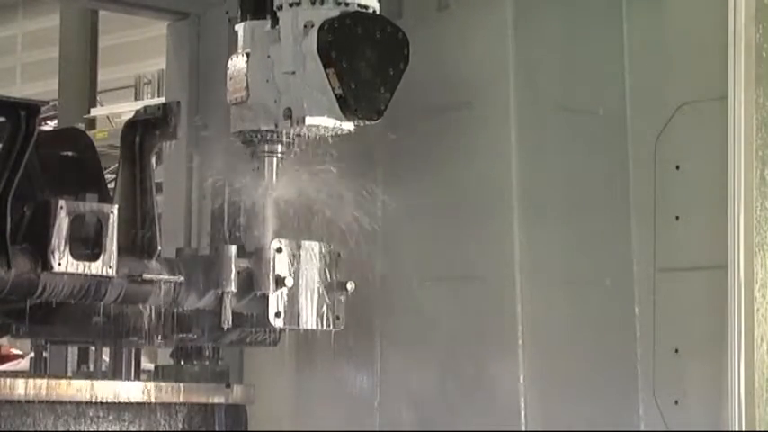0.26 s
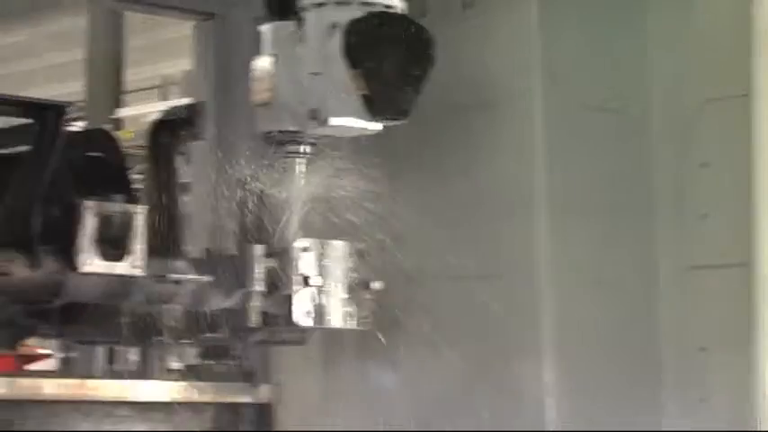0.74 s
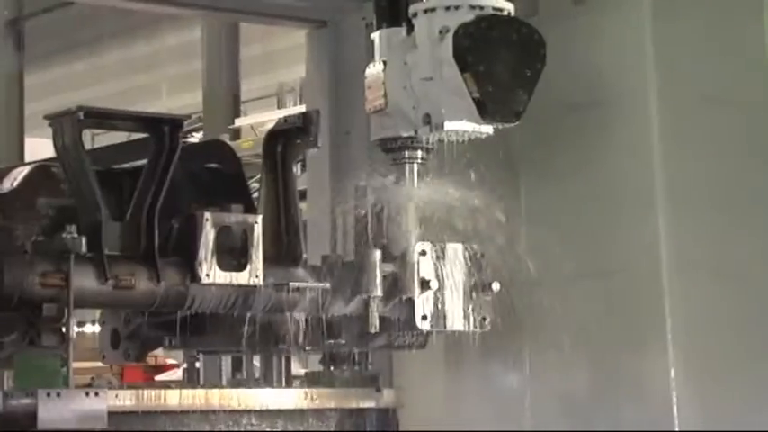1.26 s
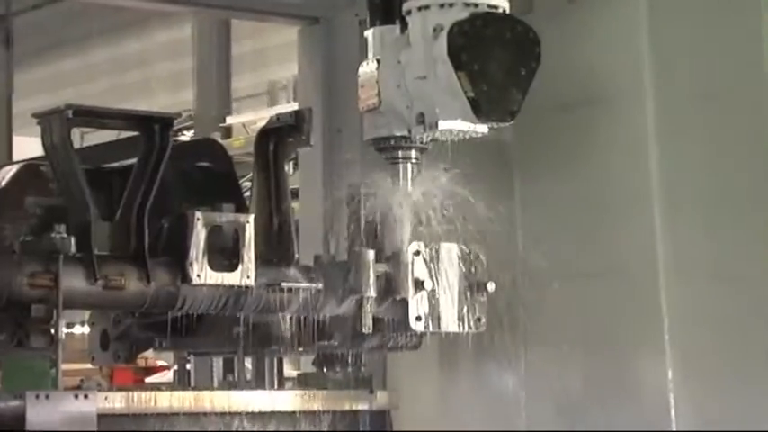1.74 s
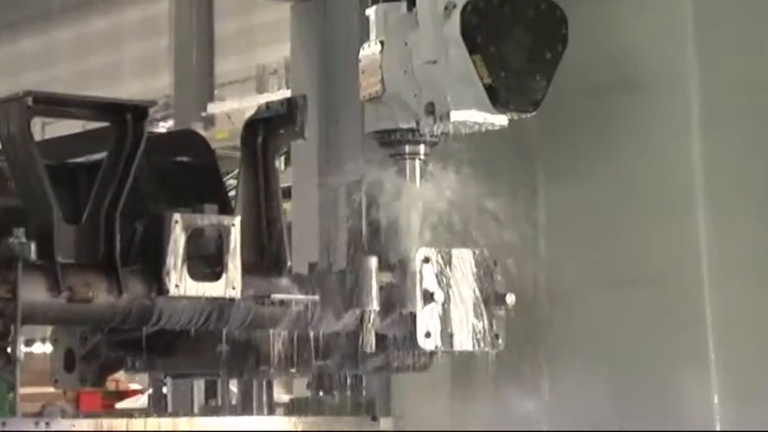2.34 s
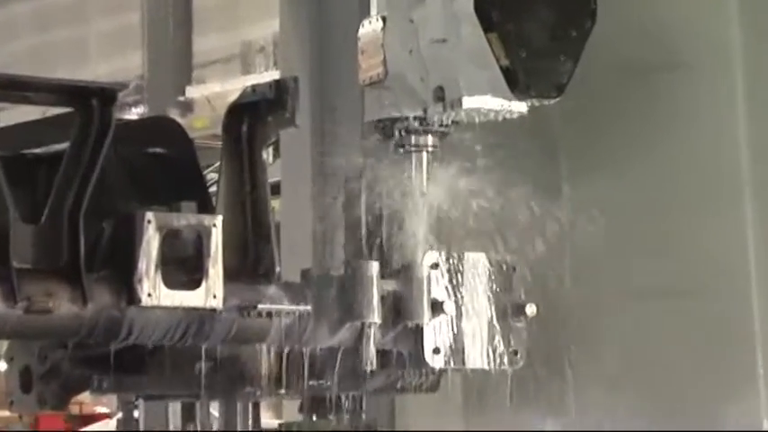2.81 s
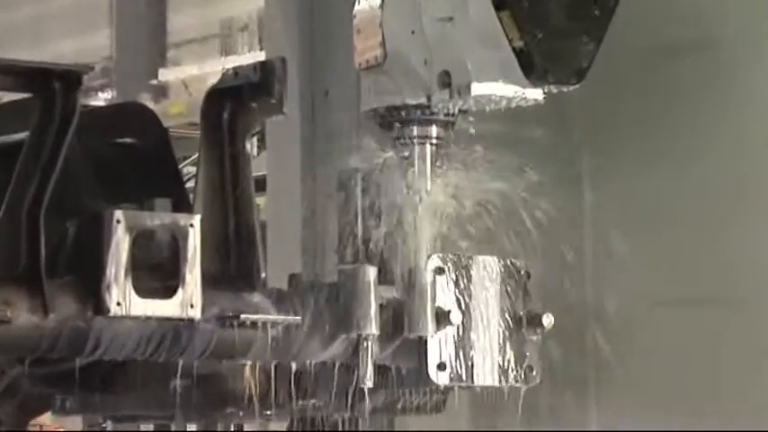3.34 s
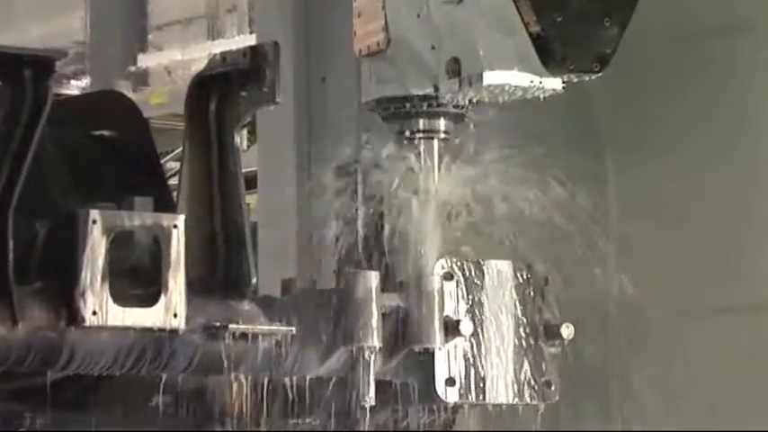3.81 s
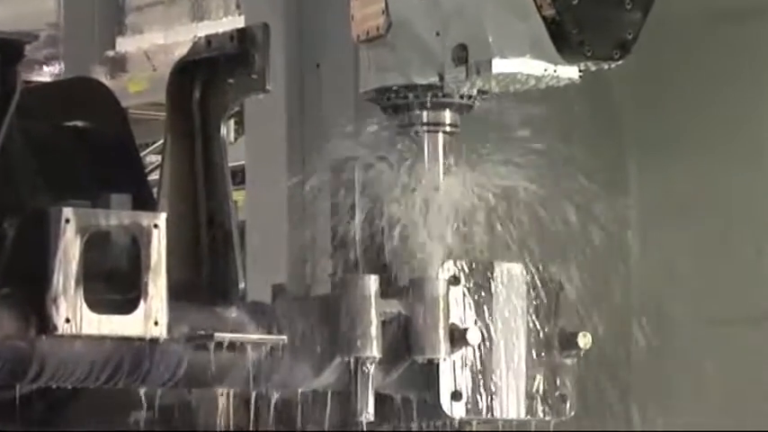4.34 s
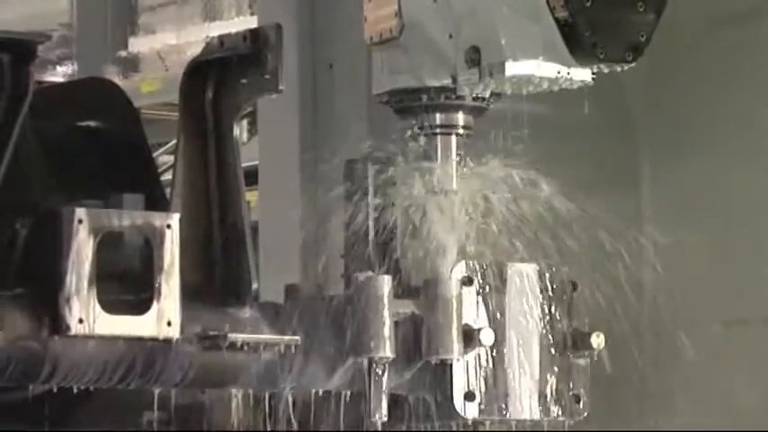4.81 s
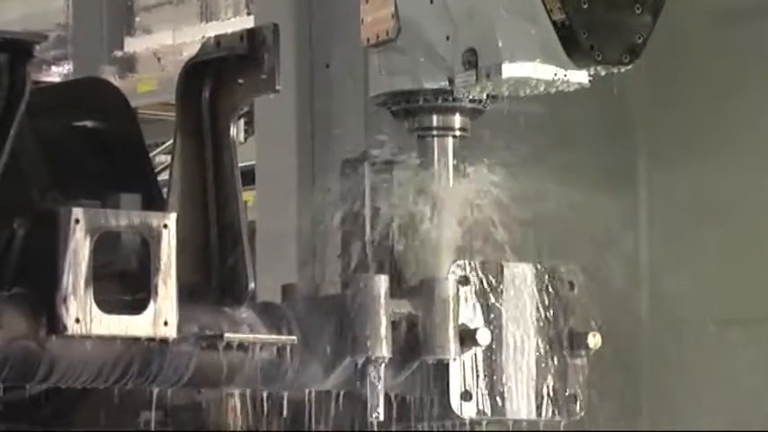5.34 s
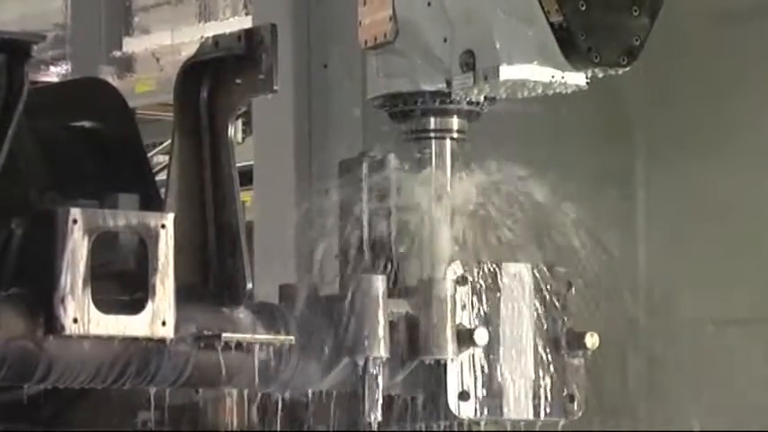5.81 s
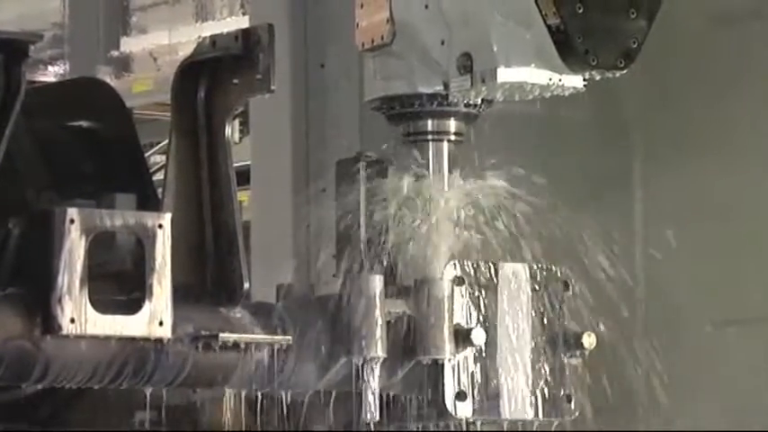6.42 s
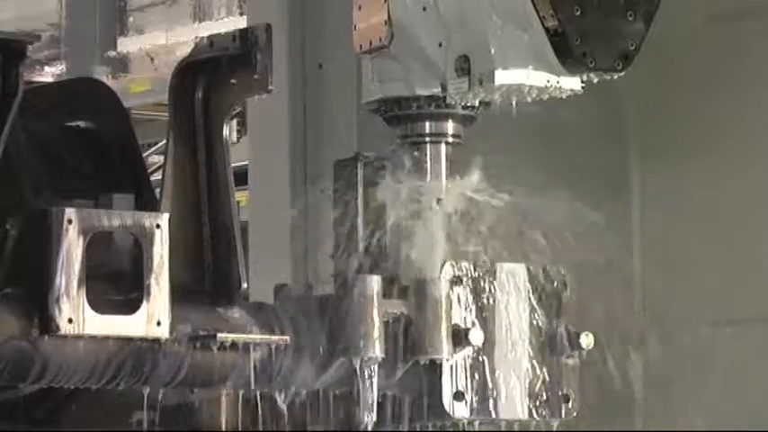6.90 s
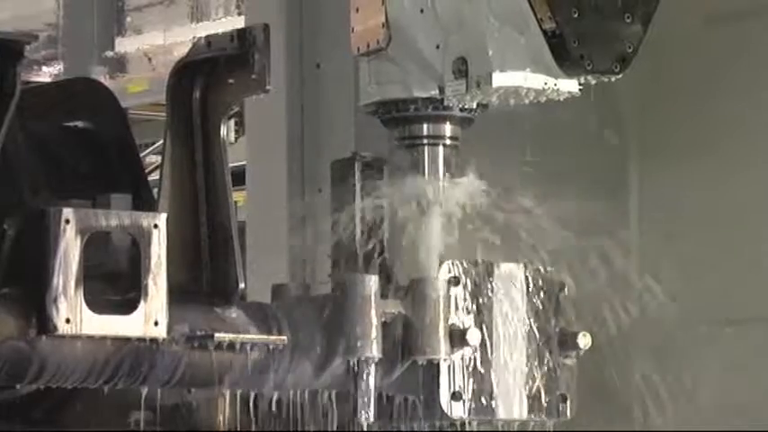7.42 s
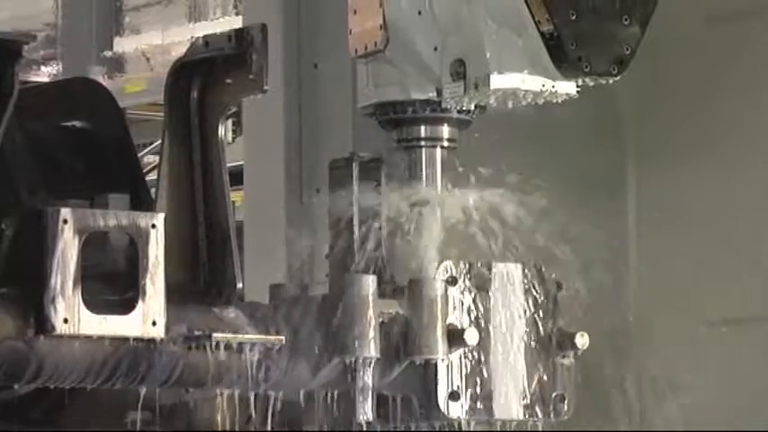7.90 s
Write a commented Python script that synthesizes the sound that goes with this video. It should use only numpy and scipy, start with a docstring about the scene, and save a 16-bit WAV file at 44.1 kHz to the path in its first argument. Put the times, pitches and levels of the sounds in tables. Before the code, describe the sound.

A piercing, uneven squeal comes from a milling tool scraping through metal, faltering and flaring shrilly, with a few short crunches of chips. After five seconds it settles suddenly into a stronger, steadier tone a little lower in pitch. Underneath, the steady hiss of spraying coolant, a low pump rumble and the spindle's hum fill the sheet-metal enclosure, with the cut sounding near and in front of everything else.

```python
"""Inside the cabin of a milling machine, a spinning cutter chatters in a metal part under a flood of coolant.
The shaking tool squeals near 2.5 kHz, ragged at first, then locks on a louder, slightly lower note
after five seconds. Chips crunch, the spray hisses, the pump rumbles and the spindle that turns the
tool hums. A limiter pushes all of it down whenever the squeal swells."""
import sys
import numpy as np
from scipy import signal
from scipy.fft import rfft, irfft, next_fast_len
from scipy.io import wavfile
from scipy.ndimage import uniform_filter1d

SR = 44100
rng = np.random.default_rng(int(sys.argv[2]) if len(sys.argv) > 2 else 0)


def master_out(mix):
    """Clip the mix to full scale and print it as 16-bit PCM to the path in sys.argv[1]."""
    frames = np.transpose(np.atleast_2d(mix))
    ceiling = np.clip(frames, -1, 1)
    pcm = np.round(ceiling * 32767).astype(np.int16)
    wavfile.write(sys.argv[1], SR, pcm)


N = 359415
TIME = np.arange(N) / SR
FREQS = np.fft.rfftfreq(N, 1 / SR)
SPINDLE_HZ = 41.37  # turns of the tool each second
LOCK_S, LOCK_TAKES_S = 4.96, 0.0413  # the ragged chatter locks into one clean note

# the squeal shifts briefly in pitch: (time [s], pitch shift [Hz], half length [s], lift [dB]); at the very
# start the upper side tone of the spindle swing takes over the note, later the tool hops to a nearby note
HOPS = [(.04, 20, 0.0804, 2), (1.1, 28, 0.051, .5), (2.03, -36.5, 0.037, 5), (4.52, -31.5, .06, 1)]


def squeal(rival_hz=2452, drift_hz=7, wander_db=0.76):
    """The tool vibrates by itself; uneven chips smear the note, and each spindle turn swings it."""
    # the cut bites unevenly: (time [s], drop [dB], half length [s], added raggedness [dB])
    falters = [(.14, 6.5, 0.019, 2), (.3, 5.5, 0.027, 3), (.59, 7.5, 0.046, 4), (1.49, 4, 0.067, 10.5),
               (1.7, 2.5, 0.17, 11.5), (2.25, 5, 0.091, 3), (2.61, 8, 0.061, -9), (2.88, 4.7, 0.033, -4.5),
               (3.18, 6.5, .16, 3.5), (3.67, 2, 0.22, 2.5), (4.11, 2.5, 0.082, -5), (4.57, 10, 0.031, 4.5),
               (4.74, 6, 0.099, 8), (4.92, 3.5, 0.054, 9), (5.55, 7, 0.087, 12.5), (6.74, 4.5, 0.045, 6),
               (6.93, 7.5, 0.079, 13), (7.18, 4.5, 0.073, -8), (7.75, 4.5, 0.051, 12)]
    # side tones of the swing: (distance from the note [times the spindle rate], relative level [dB])
    side_tones = [(-3, -11.5), (1, -3.5), (2, -8.5), (3, -12), (4, -15.5)]
    # where the squeal sits between the ears: (time [s], left minus right [dB])
    pan = [(0, 3.5), (.3, 3), (1, 2.5), (2.25, 3.5), (3.2, 1.5), (3.75, -3.5), (4.5, 1.5), (5.4, 0),
           (6.8, -1.5), (8.15, -2)]
    falter_db = swells(falters)
    level_db = state(ragged=-10.5, locked=-2.5) - falter_db + swells(HOPS, column=3)
    level_db += wander_db * flutter(4.8).real
    raggedness = gain_of(state(ragged=-7.5, locked=-20.5) + swells(falters, column=3))
    note = tone(pitch() + drift_hz * raggedness * flutter(6.41).real)
    swing = sum(gain_of(db) * np.exp(2j * np.pi * multiple * SPINDLE_HZ * TIME) * flutter(7)
                for multiple, db in side_tones)
    smear = gain_of(-6) * flutter(30)
    ring = note * (1 + raggedness * (smear + gain_of(-2) * swing))
    # a second vibration of the tool beats against the note
    ring += gain_of(state(ragged=-5.5, locked=-34)) * tone(rival_hz) * flutter(5)
    # the moving curtain of coolant makes even the locked note sway
    ring *= 1 + gain_of(-14) * flutter(32, order=4)
    # the cut sets how far the tool swings, however the two vibrations share the motion
    ring /= np.sqrt(uniform_filter1d(abs(ring) ** 2, size=6500) / 2)
    # reflections off the cabin walls reach the two ears differently
    sides = np.array([[1], [-1]])
    reflections = sides * gain_of(-20) * (note * flutter(10)).real
    ears = ring.real * gain_of(sides * follow(pan) / 2) + reflections
    return gain_of(level_db) * (ears + scrape(falter_db, rival_hz))


def pitch(sag_hz_per_s=1.1):
    """The squeal's pitch in Hz: it sinks slowly along the cut, hops, and steps down as it locks."""
    return state(ragged=2490, locked=2459) - sag_hz_per_s * TIME + swells(HOPS)


def scrape(falter_db, centre_hz, reach_hz=900, rasp=0.2):
    """The cutter's teeth scrape the metal, ringing the tool and the part in a band around the note."""
    # ringing of the tool and the part: (frequency [Hz], relative level [dB])
    ringing = [(1800, -31), (1900, -52), (1970, -14), (2150, -8), (2260, -5.5), (2330, -3.5), (2420, 4.5),
               (2520, -2.5), (2590, -12.5), (2660, -7.5), (2780, -9.5), (2900, -37), (3300, -57)]
    outside = abs(FREQS - centre_hz) > reach_hz
    noise = coloured(rng.standard_normal((2, N)), spectrum(ringing, FREQS) - 60 * outside)
    # the teeth keep scraping while the note falters, so most of its drop is given back
    level_db = state(ragged=-10.5, locked=-12.5) + 0.67 * falter_db
    return gain_of(level_db) * (1 + rasp * flutter(33).real) * noise


def overtones(waver_hz=22, fuzz_hz=80, steady=0.76, fade_db_per_s=0.5, wander_db=1.8):
    """The teeth leave the metal in each swing, which adds higher tones that waver and sound fuzzy."""
    # tones above the squeal: (frequency [times the pitch], relative level [dB])
    harmonics = [(2, 3.5), (3, -4.5), (4, -13.5)]
    # the squeal turns shrill as its octave flares: (time [s], lift [dB], half length [s])
    flares = [(.35, 9, 0.018), (.53, 3.5, 0.026), (.68, 4.5, .055), (1.0, 4.5, 0.031), (1.29, 4, 0.038),
              (2.15, 8.5, 0.051), (2.56, 11, 0.043), (3.12, 6.5, .08), (3.62, 6.5, .13), (4.06, 7.5, 0.073),
              (4.74, 11, 0.062), (5.53, 4.5, 0.06), (5.82, 4, .12), (7.16, 9, 0.017), (8.06, 5, .07)]
    # the locked note slowly mellows
    base_db = state(ragged=-32.5, locked=-25) - fade_db_per_s * np.maximum(TIME - LOCK_S, 0)
    flare_db = swells(flares) + wander_db * flutter(8).real
    hz, out = pitch(), np.zeros((2, N))
    for multiple, db in harmonics:
        # the higher overtones are fuzzier and flare less than the octave
        fuzz_db, flare_share = (-7, 1) if multiple == 2 else (-3, 0.72)
        shared = steady + flutter(waver_hz) / 2 + gain_of(fuzz_db) * flutter(fuzz_hz)
        ears = np.array([shared + gain_of(-10) * flutter(waver_hz) for _ in range(2)])
        level = gain_of(base_db + flare_share * flare_db + db)
        out += level * (tone(multiple * hz) * evened(ears)).real
    return gain_of(-2.5) * out


def chips(grains_per_s=4000, width_octaves=0.58):
    """A chip caught under the teeth breaks up in a short, bright crunch."""
    # breaking chips: (time [s], level [dB], half length [s], centre frequency [Hz])
    crunches = [(0.14, -25, 0.047, 3250), (0.323, -28, 0.083, 3300), (1.502, -31, 0.031, 6960),
                (2.245, -29.5, 0.086, 8000), (3.231, -30, 0.086, 7000), (3.772, -26, 0.013, 10000),
                (4.958, -21, 0.0047, 6450), (5.58, -35, 0.046, 7010)]
    grains = rng.standard_normal((2, N)) * (rng.random((2, N)) < grains_per_s / SR)
    out = np.zeros((2, N))
    for time, db, half_length, hz in crunches:
        band_db = -10 * np.log10(1 + (np.log2((FREQS + 1) / hz) / width_octaves) ** 4)
        bump = np.exp(-((TIME - time) / half_length) ** 2)
        out += gain_of(db) * bump * coloured(grains, band_db)
    return out


def coolant(drops_per_s=1800, drop_db=-9, spread_db=3.5, gush_db=1.3):
    """Fine mist hisses and single drops tick as the tool flings the jet away in gushes."""
    # hiss of the spray: (frequency [Hz], relative level [dB])
    spray = [(600, -36), (2000, 3), (3150, 3.5), (3750, -1.5), (4400, 2.5), (5250, 5), (5900, -3),
             (6800, -1.5), (7500, 3), (8000, 0), (8900, 3.5), (9600, -0.5), (10300, -4), (11000, -7)]
    # loudness of the hiss over time: (time [s], level [dB])
    hiss_level = [(0, -27.5), (1.5, -26.5), (3.2, -25), (4.8, -25.5), (6, -23.5), (8.15, -22)]
    sizes = gain_of(spread_db * np.minimum(rng.exponential(1, (2, N)), 5))
    signs = rng.choice([-1, 1], (2, N))
    drops = evened(sizes * signs * (rng.random((2, N)) < drops_per_s / SR))
    mist = rng.standard_normal((2, N))
    bass_cut_db = 24 * np.log2(np.maximum(spray[0][0] / (FREQS + 1), 1))
    hiss = coloured(mist + gain_of(drop_db) * drops, spectrum(spray, FREQS) - bass_cut_db)
    return gain_of(follow(hiss_level) + gush_db * flutter(46).real) * hiss


def cabin(swell_db=0.76):
    """The pump and the falling coolant rumble in the sheet-metal cabin."""
    # pump and coolant drumming on the cabin: (frequency [Hz], relative level [dB])
    rumble = [(20, -41), (70, -15.5), (100, -5), (125, 1), (170, 2), (225, -6), (270, 2), (340, -8.5),
              (520, 0.5), (760, -2.5), (1000, -5), (1450, 1), (1650, -10), (2600, 2.5)]
    # notes at which the cabin rings: (frequency [Hz], width [Hz], lift [dB])
    panels = [(172.4, 11, 8), (202, 7.4, 10), (244, 19, 2.5), (376, 18, 8), (918, 7.4, 9), (1418, 66, -1),
              (1500, 25, 4.5), (1753, 38, 6.5)]
    # strength of the rumble: (time [s], level [dB])
    pump = [(0, -26.5), (1, -30), (2.1, -28), (2.7, -26.5), (3.3, -28), (4, -29), (5, -28.5), (8.15, -27.5)]
    lift_db = sum(db / (1 + (2 * (FREQS - hz) / width) ** 2) for hz, width, db in panels)
    treble_cut_db = 24 * np.log2(np.maximum(FREQS / rumble[-1][0], 1))
    noise = coloured(rng.standard_normal((2, N)), spectrum(rumble, FREQS) + lift_db - treble_cut_db)
    return gain_of(follow(pump) + swell_db * flutter(14).real) * noise


def drive(waver=0.36, waver_hz=5):
    """The spindle hums, the machine whines and the gears strain, each tone wavering on its own."""
    # hum of the spindle drive: (frequency [times the spindle rate], relative level [dB])
    hums = [(4, -43), (7, -50.5), (8, -51.5), (10, -61), (12, -46), (13, -44.5), (14, -47.5), (15, -45),
            (17, -45.5), (17.5, -47.5), (18, -55.5), (18.5, -58.5), (19, -45.5), (34, -37), (44, -42.5)]
    # steady whines of the machine: (frequency [Hz], relative level [dB])
    whines = [(1225, -48.5), (2583, -30.5), (2611, -30), (4100, -46.5), (6590, -72), (8830, -66)]
    # gear whines that grow with the load: (frequency [Hz], relative level at full load [dB])
    gears = [(662, -31.5), (4728, -38), (7192, -41), (8240, -45)]
    # strain on the drive: (time [s], change in gear level [dB])
    load = [(0, -25), (4.5, -14), (5.6, -6.5), (6.7, -8), (7.2, -1), (8.15, 0)]
    tones = [(multiple * SPINDLE_HZ, db) for multiple, db in hums] + whines
    tones += [(hz, db + follow(load)) for hz, db in gears]
    hum = sum(gain_of(db) * (tone(hz) * evened(1 + waver * flutter(waver_hz))).real for hz, db in tones)
    return gain_of(-1) * hum


def walls(sound, echo_db=-13, count=24):
    """Short echoes between the cabin walls, 2 to 25 ms late, colour the sound."""
    echoes = np.zeros(SR // 40)
    strengths = gain_of(echo_db) * rng.choice([-1, 1], count) / np.sqrt(count)
    echoes[rng.integers(SR // 500, len(echoes), count)] = strengths
    echoes[0] = 1  # the direct sound
    return signal.oaconvolve(sound, echoes[None], axes=1)[:, :N]


def state(ragged, locked):
    """A value that moves from its ragged to its locked setting when the note locks."""
    return ragged + (locked - ragged) * np.clip((TIME - LOCK_S) / LOCK_TAKES_S, 0, 1)


def swells(rows, column=1):
    """A smooth bump for each row (time, height, half length, ...); column picks the heights."""
    coarse = TIME[::64]
    bumps = sum(row[column] * np.exp(-((coarse - row[0]) / row[2]) ** 2) for row in rows)
    return np.interp(TIME, coarse, bumps)


def gain_of(db):
    """Turns decibels into a factor to multiply by."""
    return 10 ** (np.asarray(db) / 20)


def evened(x):
    """Scales a signal to an average power of 1."""
    return x / np.sqrt(np.mean(abs(x) ** 2) + 1e-20)


def follow(points):
    """Joins (time, value) points with straight lines, giving a value at every sample."""
    return np.interp(TIME, *np.transpose(points))


def spectrum(points, hz):
    """Joins (frequency, value) points with straight lines on a scale of octaves."""
    frequencies, values = np.transpose(points)
    return np.interp(np.log(hz + 1), np.log(frequencies + 1), values)


def flutter(rate_hz, order=2, size=8192):
    """A random wobble in complex numbers, with power near 1, mostly slower than rate_hz."""
    hz = np.fft.fftfreq(size, TIME[-1] / size)
    noise = rng.standard_normal(size) + 1j * rng.standard_normal(size)
    wobble = np.fft.ifft(noise / (1 + 1j * hz / rate_hz) ** order)
    return np.interp(TIME, np.linspace(0, TIME[-1], size), evened(wobble))


def tone(hz):
    """A tone in complex numbers, on a steady or moving pitch; its real part has power 1."""
    return np.sqrt(2) * np.exp(2j * np.pi * np.cumsum(hz * np.ones(N)) / SR)


def coloured(pair, shape_db):
    """Two unrelated noises become a partly alike left and right, with the tone colour shape_db."""
    # how alike the two ears hear the noise: (frequency [Hz], likeness [0 to 1])
    likeness = [(60, 0.84), (130, 1), (550, 0.95), (1150, 0.97), (2400, 0.57), (5000, 0.88), (10600, 0.71)]
    size = next_fast_len(N)
    hz = np.fft.rfftfreq(size, 1 / SR)
    same = np.clip(spectrum(likeness, hz), 0, 1)
    shaped = rfft(pair, size) * gain_of(np.interp(hz, FREQS, shape_db))
    mid, side = shaped * np.sqrt([1 + same, 1 - same])
    return evened(irfft(np.array([mid + side, mid - side]), size)[:, :N])


def scene():
    """The cut, the machine and the coolant together."""
    return squeal() + overtones() + drive() + cabin() + walls(coolant() + chips())


def record(dry, limit_db=-9.5, recover_db_per_s=32, top_hz=11060):
    """A limiter turns loud moments down fast and recovers slowly; then the highest treble is cut."""
    power = uniform_filter1d((dry ** 2).mean(0), size=128)
    power_db = 10 * np.log10(abs(power) + 1e-12)
    recovery_db = TIME * recover_db_per_s
    held_peak_db = np.maximum.accumulate(power_db + recovery_db) - recovery_db
    over_db = np.maximum(held_peak_db - limit_db, 0)
    limited = dry / gain_of(uniform_filter1d(over_db, size=100))
    low_pass = signal.firwin(1023, top_hz, window=("kaiser", 9), fs=SR)
    return signal.oaconvolve(limited, low_pass[None], "same")


dry = scene()
out = record(dry)
master_out(out)
```